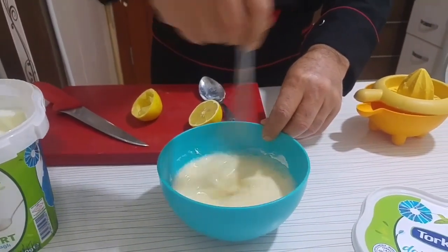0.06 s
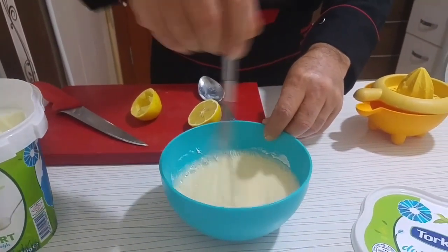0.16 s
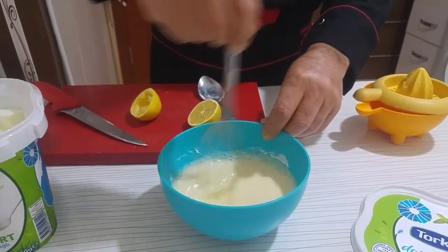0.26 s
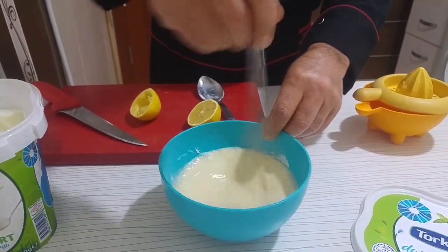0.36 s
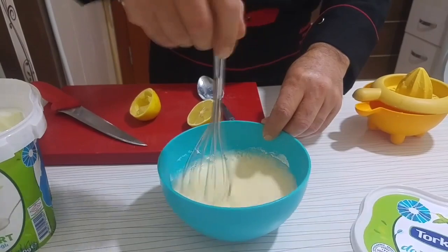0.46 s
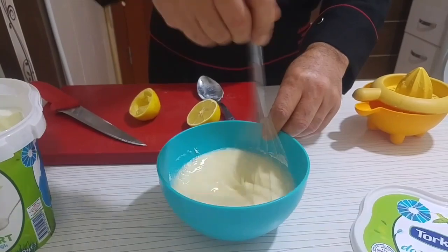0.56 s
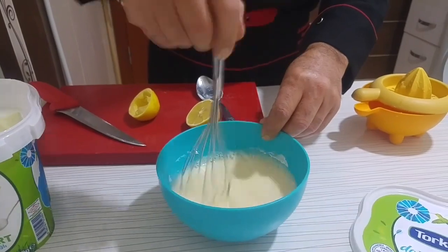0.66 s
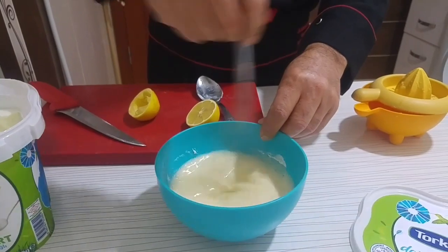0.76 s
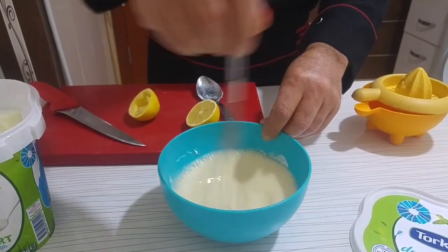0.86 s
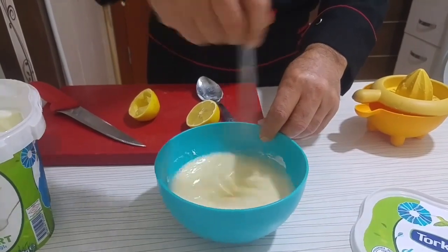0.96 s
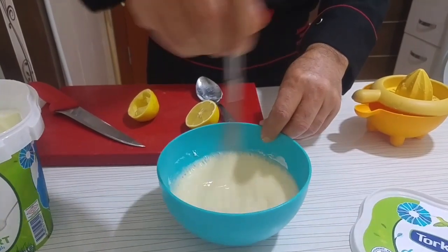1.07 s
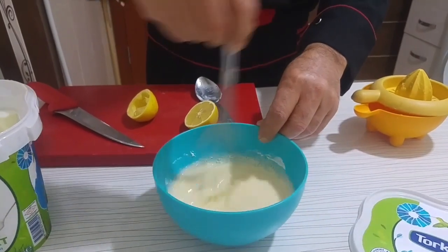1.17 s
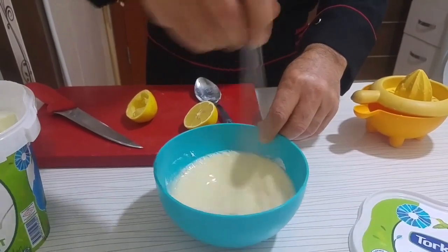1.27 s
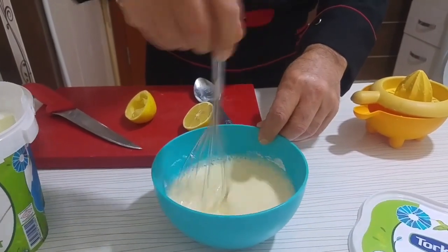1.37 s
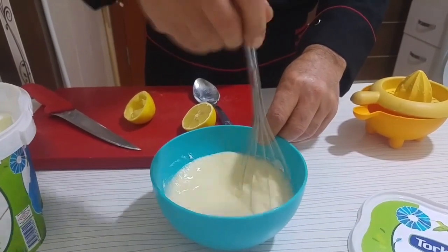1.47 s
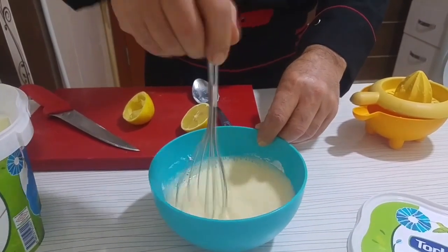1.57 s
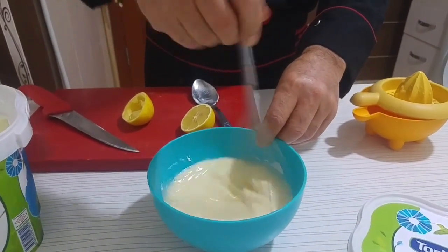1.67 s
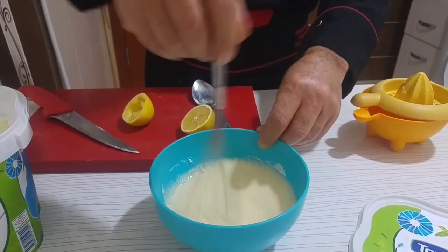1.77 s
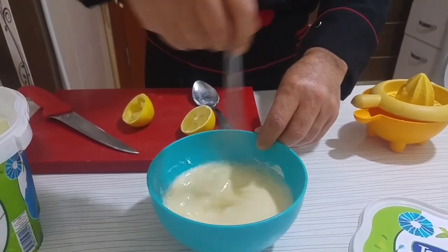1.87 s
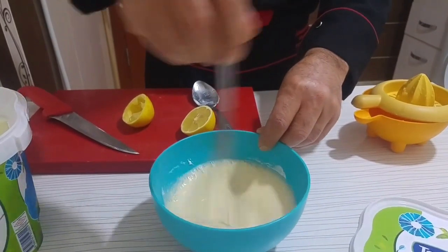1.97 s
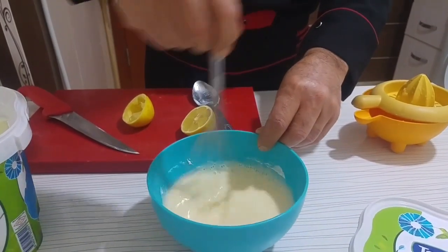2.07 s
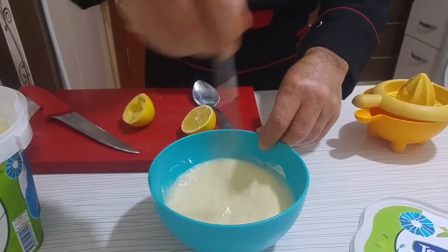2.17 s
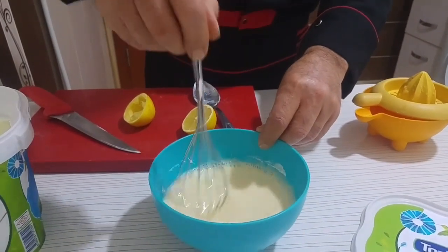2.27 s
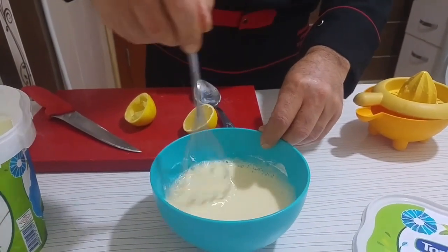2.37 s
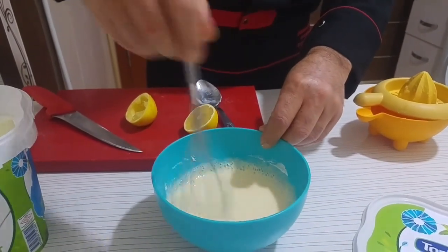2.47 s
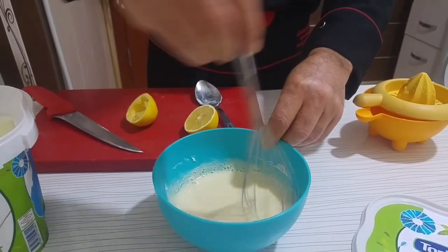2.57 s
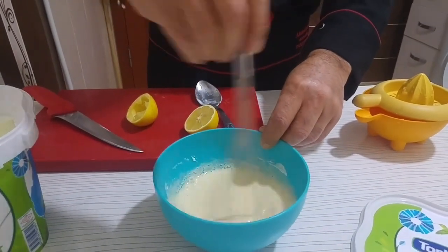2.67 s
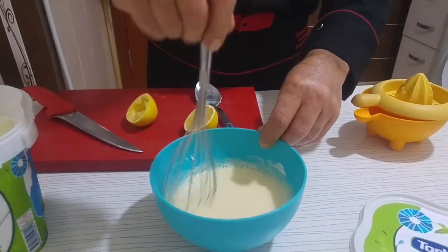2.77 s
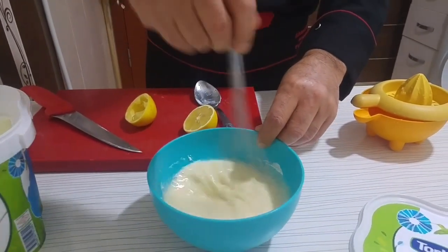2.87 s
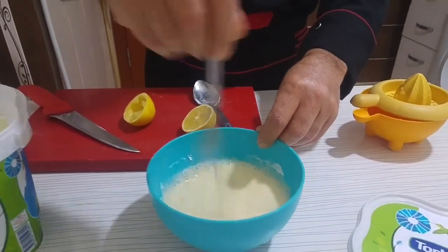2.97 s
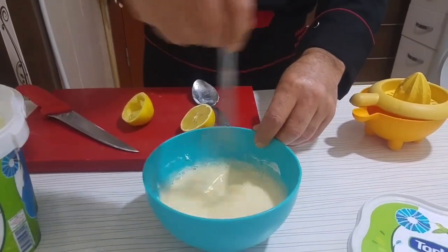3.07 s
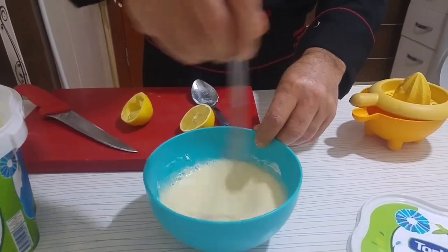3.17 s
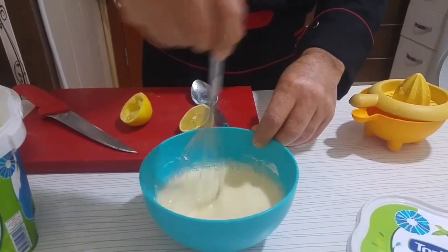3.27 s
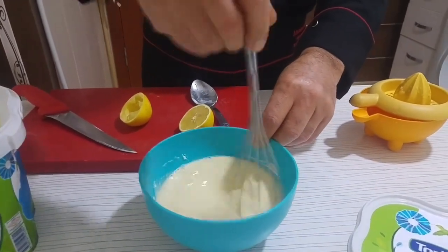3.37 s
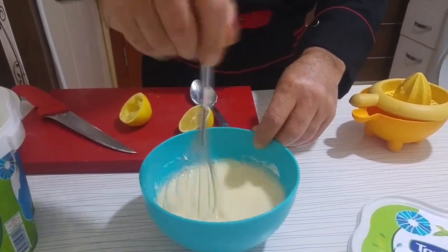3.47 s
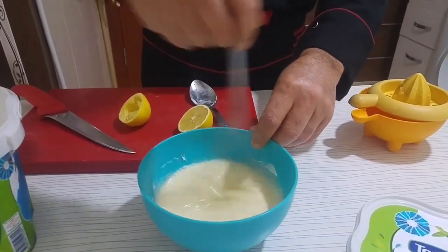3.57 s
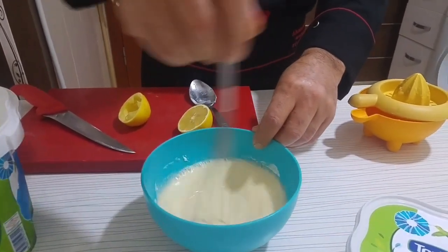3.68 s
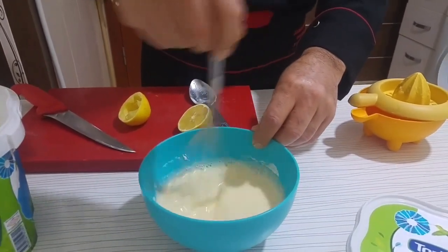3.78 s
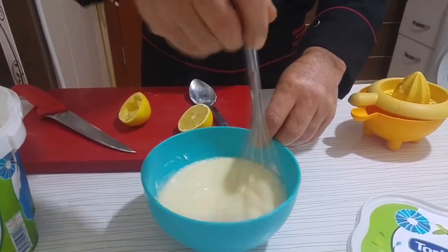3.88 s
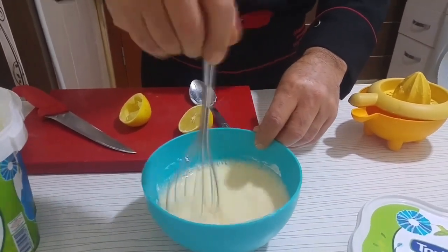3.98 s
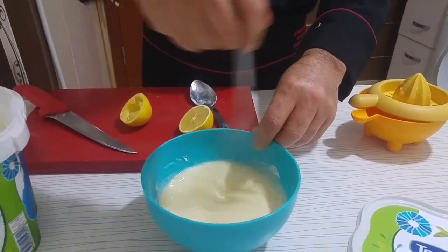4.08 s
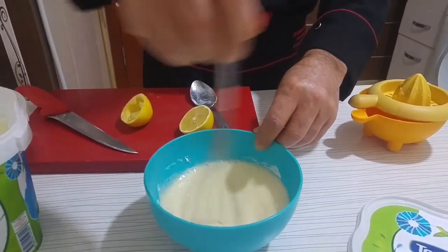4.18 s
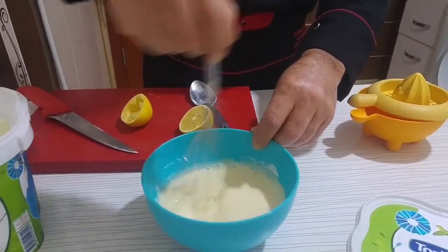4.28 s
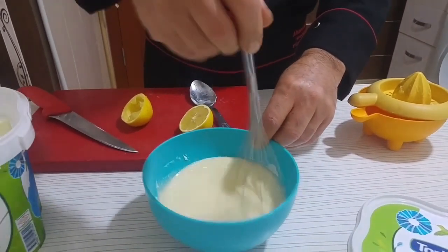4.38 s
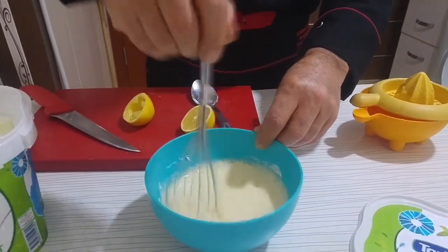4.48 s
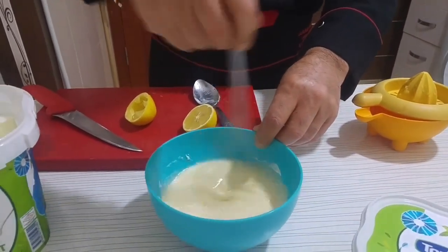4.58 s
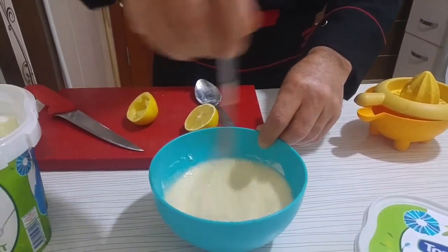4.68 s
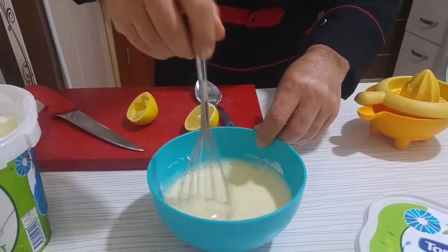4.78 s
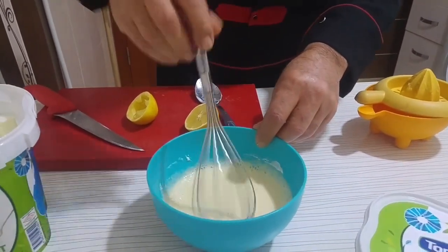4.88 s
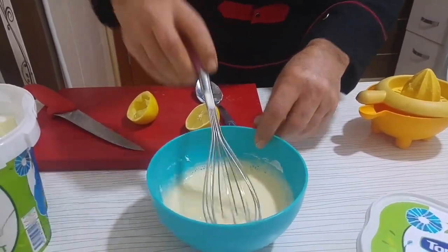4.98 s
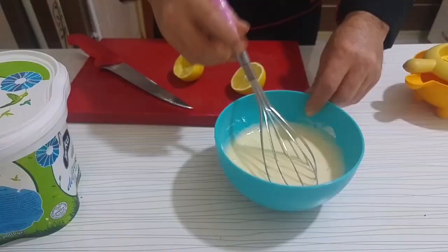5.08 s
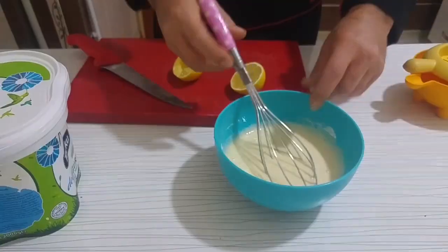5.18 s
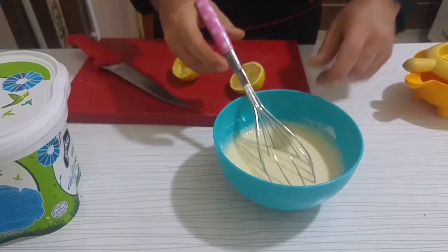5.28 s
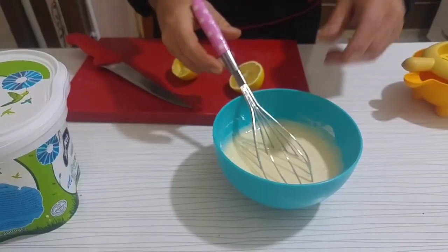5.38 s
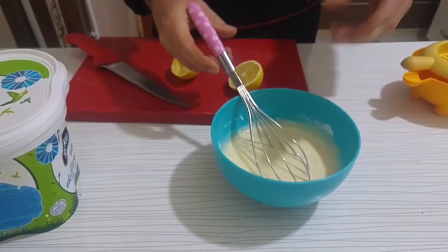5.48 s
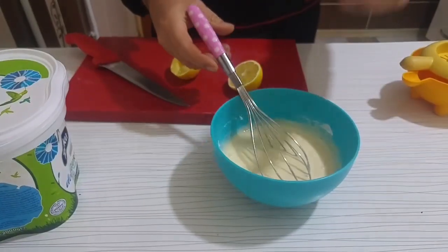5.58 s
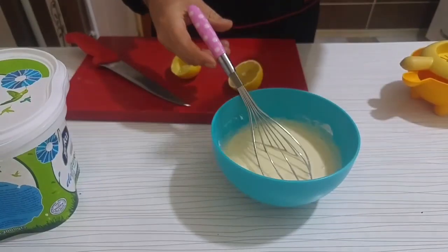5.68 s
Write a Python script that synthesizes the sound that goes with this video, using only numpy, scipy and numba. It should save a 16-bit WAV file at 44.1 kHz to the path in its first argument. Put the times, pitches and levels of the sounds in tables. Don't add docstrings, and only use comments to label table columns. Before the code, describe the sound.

Close stereo pickup in a small kitchen: a wire whisk beats thick batter in a plastic bowl, about four forward strokes a second. Each slap gives a hollow knock and bright wire jangle, answered by lighter return taps and scraping. The bowl rocks with soft table thuds over faint room hum. Near five seconds the whisking stops, the bowl lands with a low bump, and sound cuts off.

```python
import sys
import numpy as np
from scipy import signal
from scipy.fft import rfft, irfft
from scipy.io import wavfile
from numba import njit

SR = 44100
rng = np.random.default_rng(int(sys.argv[2]) if len(sys.argv) > 2 else 0)


def int16_out(signal):
    q = np.round(np.clip(np.atleast_2d(signal).T, -1, 1) * 32767)
    wavfile.write(sys.argv[1], SR, q.astype(np.int16))


def natural_amplitude(level_db):
    exponent = np.asarray(level_db, float) / 20
    return 10 ** exponent


N = 252252

STOP_S = 5.2735
SLAP_MS, FLURRY_MS = 11, 6.5
PORT_LAG_MS, PORT_SPREAD_MS, PORT_LEAN_DB = 0.025, 0.068, -0.04

# (frequency [Hz], width [Hz], level [dB])
WALL_MODES = [(695, 108, -2.5), (1008.5, 61, -2), (1190, 76, -4), (1265, 43, -3.5), (1440, 90, -17),
              (1730, 37, -2.5), (1830, 110, 2.5), (2102, 85, 3.5), (2090, 83, -1), (2200, 39, -9),
              (2648, 90, -6.5)]
# (frequency [Hz], width [Hz], level [dB])
LOOP_MODES = [(2480, 84, -14), (3730, 77, -5.5), (4880, 41, 1), (5200, 52, -5), (6647, 45, -7),
              (8282, 60, -5.5)]


def clacks():
    s, db, hz, bright_db, length_ms, wire_hz = contacts()
    s = s - 0.003
    db, bright_db, length_ms = db[:, None], bright_db[:, None], length_ms[:, None]
    latest = np.maximum(np.searchsorted(s, np.arange(N) / SR) - 1, 0)

    at, size, lag = flurry(s, 1.4 * length_ms, count=28, swell=0.55, uneven_db=3.0)
    body = clicks(at, size * natural_amplitude(db), lag, 3.0)
    wall = ring(body, WALL_MODES)
    spot = band_both(body, hz[latest], 98.0)
    knock = band_both(band_both(body, steady(1450), 850.0), steady(1500), 750.0)
    wire = band_both(clicks(at, size * natural_amplitude(db + bright_db), 3.4 * lag, -1.7), wire_hz[latest], 490.0)
    loops = ring(clicks(at, size * natural_amplitude(db + 0.98 * bright_db), 3.0 * lag, 0), LOOP_MODES)

    at, size, lag = flurry(s, 1.7 * length_ms, count=70, uneven_db=2.0)
    slap = jangle(at, size * natural_amplitude(db + bright_db), lag, t60_s=0.0053, broad=0.33)

    at, size, lag = flurry(s, 7.5 * length_ms, count=190, swell=0.2, uneven_db=2.5)
    light_db = -2 * (length_ms != SLAP_MS)
    skid = jangle(at, size * natural_amplitude(db + bright_db + light_db), lag, t60_s=0.034, broad=0.21)
    struck = natural_amplitude(-11) * wall + natural_amplitude(34.5) * spot + natural_amplitude(17.0) * knock
    wiry = natural_amplitude(35.0) * wire + natural_amplitude(-14) * loops + natural_amplitude(32) * slap + natural_amplitude(26) * skid
    return struck + wiry


# (time [s], peak level [dB], wall pitch [Hz], brightness [dB])
SLAPS = [(0.0939, -16, 1900, -7), (0.163, -10.5, 1370, -6.5), (0.3883, -10, 1330, -7.5),
         (0.6192, -5.5, 2030, -9), (0.857, -8, 1410, -7), (1.0847, -8.5, 1360, -4), (1.305, -10, 1420, -6),
         (1.549, -8, 1476, -4), (1.7737, -10.5, 2100, -8.5), (1.918, 0, 1730, -16),
         (1.9927, -7.5, 1380, -3.5), (2.229, -5, 2090, -7), (2.484, -2, 1736, -12),
         (2.9589, -8.5, 1946, -9), (2.978, -12.5, 1167, -13.5), (3.2009, -2.5, 2090, -8),
         (3.2051, -10, 1305, -3), (3.493, -15, 1250, -5), (3.6752, -10, 1376, -5.5),
         (3.8554, -8, 1780, -14.5), (3.919, -7.5, 1380, -6), (4.1658, -9, 1450, -7), (4.429, -12, 1100, -8),
         (4.4359, -14.5, 1400, -3), (4.671, -11.5, 1470, -1.5), (4.9236, -8.5, 1440, -4.5)]
# (time [s], peak level [dB], wall pitch [Hz], brightness [dB])
SCUFFS = [(0.0794, -15, 1820, -21), (0.5342, -17, 1870, -34), (0.6594, -17.5, 1670, -8.5),
          (0.9906, -16.5, 1950, -22.5), (1.052, -22.5, 1910, -5), (1.2301, -17, 1950, -20),
          (1.28, -22, 1900, -4), (1.5918, -11, 1280, -12), (1.6699, -15.5, 1730, -10),
          (1.694, -12.5, 1730, -14.5), (1.7469, -23.5, 1830, -6.5), (2.1201, -10, 2200, -22),
          (2.37, -12.5, 1730, -16), (2.7236, -23, 1300, -13), (2.7681, -22, 1300, -16),
          (2.7811, -23.5, 1830, -6.5), (2.8626, -22.5, 1180, -20), (2.8918, -20, 2010, -17),
          (3.133, -12.5, 1780, -13.5), (3.352, -19.5, 2020, -22), (3.44, -16.5, 1970, -10),
          (1.4556, -12.5, 1900, -16.5), (4.0072, -19, 1650, -14.5), (4.0711, -15.5, 1990, -23.5),
          (4.2098, -21, 1340, -7), (4.3655, -16, 1730, -13.5), (4.4729, -11, 1980, -14),
          (4.576, -11.5, 1830, -11), (4.838, -12.5, 1730, -12), (5.22, -37.5, 1190, -10.5)]
# (time [s], peak level [dB], brightness [dB])
REBOUNDS = [(0.208, -17, -6.5), (0.4393, -17, -6.5), (0.8984, -14, -8), (1.0124, -15, -11),
            (1.1328, -11, -14), (1.3597, -13, -10), (1.3868, -17.5, -14.5), (1.8237, -12.5, -12.5),
            (2.6086, -15, -31), (2.7053, -26, -14.5), (3.0945, -13, -10), (3.3642, -12.5, -13.5),
            (3.593, -14, -13.5), (3.738, -17.5, -13), (3.976, -11.5, -22), (4.2232, -9, -11),
            (4.7282, -10, -9.5), (4.982, -18, -26.5), (5.262, -33, -9.5)]
# (time [s], peak level [dB], brightness [dB], ring level [dB])
TAPS = [(0.014, -31.5, -25, -24), (0.055, -22.5, -41, -44.5), (0.096, -35, -26, -26),
        (0.2616, -19, -31, -28), (0.4831, -13.5, -22.5, -27), (0.7206, -16.5, -12, -19.5),
        (0.9428, -20, -6, -20), (1.178, -26.5, -28, -25), (1.4117, -15, -9.5, -20),
        (1.6405, -21.5, -13.5, -22), (1.8569, -18.5, -21.5, -17.5), (2.0926, -22.5, -21, -16.5),
        (2.159, -28, -19.5, -21.5), (2.321, -27.5, -20.5, -24.5), (3.027, -33.5, -17.5, -38),
        (3.5182, -17, -15.5, -19), (3.7718, -11.5, -14.5, -15.5), (4.0397, -17, -18.5, -29),
        (4.2822, -15.5, -22.5, -27), (4.322, -21, -17, -39), (4.5352, -10.5, -16.5, -21.5),
        (4.8008, -18.5, -25.5, -17), (5.019, -20, -27, -19.5)]


def contacts():
    rebound_hz, tap_hz = 967, 1450
    rows = SLAPS + SCUFFS
    rows = rows + [(s, db, rebound_hz, bright) for s, db, bright in REBOUNDS]
    rows = rows + [(s, db, tap_hz, bright) for s, db, bright, _ in TAPS]
    s, db, hz, bright_db = np.transpose(sorted(rows))
    octaves = 0.16 * np.maximum(db + bright_db + 29.5, 0) + 0.2 * rng.standard_normal(len(s))
    wire_hz = np.clip(3300 * 2 ** octaves, 2600, 6500)
    length_ms = np.where(np.isin(s, np.transpose(SLAPS)[0]), SLAP_MS, FLURRY_MS)
    return s, db, hz, bright_db, length_ms, wire_hz


# (frequency [Hz], density level [dB per Hz])
CRACK = [(1350, -63.5), (2300, 1), (3070, -2), (3920, -0.5), (4260, -1), (5020, -0.5), (7140, -6),
         (7750, -11), (8490, -7.5), (9840, -10.5), (13800, -11), (15300, -22), (16400, -53)]


def jangle(at, size, lag, t60_s, broad):
    t = np.arange(SR // 20) / SR
    loop, out = rng.integers(0, 6, at.shape), 0
    for k in range(6):
        shared, own = rng.standard_normal(len(t)), rng.standard_normal((2, len(t)))
        tail = level((shared + 1.2 * own) * natural_amplitude(-60 * t / t60_s), -33)
        edges_hz = 2200 * 1.4 ** np.array([k, k + 1])
        band = signal.butter(2, edges_hz, "band", fs=SR, output="sos")
        tail = broad * tail + (1 - broad) * np.sqrt(6) * signal.sosfilt(band, tail)
        ticks = clicks(at, size * (loop == k), lag, 0)
        out = out + signal.oaconvolve(ticks, tail, axes=1)[:, :N]
    return colour(out, CRACK) * natural_amplitude([[-0.5], [0.5]])


# (time [s], level [dB])
EFFORT = [(0, 1.5), (0.15, -3), (0.7, 0), (1.2, 0), (2.1, 2.5), (2.4, -3.5), (2.54, -24), (2.69, -14),
          (2.92, -1.5), (3.14, -7.5), (3.57, 1), (4.12, 1), (4.5, 3), (4.92, 0.5), (5.02, -15), (5.14, -39),
          (5.24, -80)]


def drag():
    slaps, taps, rocks = np.transpose(SLAPS), np.transpose(TAPS), np.transpose(ROCKS)
    press = natural_amplitude(np.interp(np.arange(N) / SR, *np.transpose(EFFORT)))
    leaving = after(N / SR - slaps[0], 0 * slaps[0], fade_s=0.044)[::-1]
    lift = natural_amplitude(-4 * np.minimum(leaving, 1))

    at = np.sort(rng.random(8000)) * STOP_S
    sign = np.sign(rng.standard_normal(len(at)))
    grip = np.minimum(rng.exponential(size=len(at)), 4)
    lag = PORT_LAG_MS + PORT_SPREAD_MS * rng.standard_normal(len(at))
    pair = 2 * rng.integers(0, 10, len(at))
    modes = WALL_MODES + WHISK_MODES + LOOP_MODES
    wall = 0
    for k in range(0, 20, 2):
        wall = wall + ring(clicks(at, sign * natural_amplitude(7.3 * grip) * (pair == k), lag, 1.5), modes[k:k + 2])
    wires = jangle(at, sign * natural_amplitude(2.3 * grip), lag, t60_s=0.078, broad=0.13)
    table = ring(clicks(at, sign, lag, 0), TABLE_LOW + TABLE_HIGH)

    skid = after(taps[0], taps[3] - 14, fade_s=0.04)
    chatter = after(rocks[0], rocks[1] - 15.5, fade_s=0.12)
    scrape = level(wall, -2.5) * lift * (press * natural_amplitude(-36) + skid)
    rustle = level(wires, -4.0) * lift * press * natural_amplitude(-32)
    shake = level(table, -2.0) * (press * natural_amplitude(-43) + chatter)
    return scrape + rustle + shake


# (time [s], peak level [dB], upper modes [dB])
ROCKS = [(0.034, -25, -27), (0.241, -27.5, -12), (0.479, -27, -7.5), (0.717, -23.5, 0), (0.896, -28, -9),
         (1.172, -19, -12.5), (1.406, -23.5, -4), (1.586, -22, -11.5), (1.693, -36, -19), (1.869, -22, -12),
         (1.944, -25.5, -9), (2.091, -13.5, -7.5), (2.234, -21, -15), (2.317, -14, -9), (2.872, -33, -8),
         (3.027, -16, -6.5), (3.205, -18.5, -11.5), (3.364, -36.5, -38), (3.499, -24.5, -24),
         (3.622, -38.5, -9), (3.777, -21, -28.5), (4.035, -17, -4.5), (4.222, -19, -10.5),
         (4.473, -27.5, -1.5), (4.535, -15, -10), (4.735, -28.5, -0.5), (4.776, -15.5, -9),
         (5.056, -27, -7.5)]
# (time [s], peak level [dB], upper modes [dB])
SETTLE = [
    (5.219, -38, -13),
    (5.264, -13.5, -17.5),
]
# (frequency [Hz], width [Hz], level [dB])
TABLE_LOW = [(62.2, 40, -20), (135.7, 5.9, -3.5), (163.9, 5.2, -7.5)]
TABLE_HIGH = [(206.7, 8.9, -4.5), (255, 4.5, -11), (294.5, 12.8, -2), (392.3, 66, 1.5), (636, 80, 3)]


def thuds():
    pushes = [(s, db - 23, -7) for s, db, _, _ in SLAPS]
    s, db, upper_db = np.transpose(ROCKS + SETTLE + pushes)
    at, size, lag = flurry(s, 7, count=3)
    size = size * [0, 0.6, 0.5] + [1, 0, 0]
    low = ring(clicks(at, size * natural_amplitude(db)[:, None], lag, 0), TABLE_LOW)
    high = ring(clicks(at, size * natural_amplitude(db + upper_db)[:, None], lag, -1.9), TABLE_HIGH)
    soft = signal.butter(2, 1100, fs=SR, output="sos")
    return signal.sosfilt(soft, natural_amplitude(-7.5) * low + natural_amplitude(-1) * high)


# (frequency [Hz], width [Hz], level [dB])
WHISK_MODES = [(869, 13, 1.5), (806, 14, -35.5), (1440, 96, 0)]


def whisk():
    rings = [(s, ring_db) for s, _, _, ring_db in TAPS]
    rings = rings + [(s, db - 27.5) for s, db, _ in REBOUNDS]
    s, db = np.transpose(rings)
    return natural_amplitude(-1.0) * ring(clicks(s + 0.003, natural_amplitude(db), PORT_LAG_MS, 1.3), WHISK_MODES)


def echo(near):
    t60_s, damp = 0.3, 0.3
    lags = rng.integers(300, 1800, 8)
    high = signal.butter(2, 300, "high", fs=SR, output="sos")
    treble = signal.sosfilt(high, near.mean(axis=0))
    return natural_amplitude(-10.5) * walls(treble, lags, natural_amplitude(-60 * lags / SR / t60_s), damp)


@njit
def walls(x, lags, gain, damp):
    line, soft, out = np.zeros((8, 4096)), np.zeros(8), np.zeros((2, len(x)))
    for i in range(len(x)):
        total = 0.
        for k in range(8):
            soft[k] += (1 - damp) * (gain[k] * line[k, (i - lags[k]) & 4095] - soft[k])
            total += soft[k]
            out[k % 2, i] += soft[k]
        for k in range(8):
            line[k, i & 4095] = x[i] + soft[k] - total / 4
    return out


# (frequency [Hz], density level [dB per Hz])
ROOM_TONE = [(22, -30.5), (40, -7.5), (65, -9), (110, -17), (300, -8), (520, -22.5), (900, -1),
             (1500, -15.5), (2600, -29), (4400, -17.5), (5200, -20), (5900, -28), (6800, -27.5),
             (15500, -39)]
# (frequency [Hz], width [Hz], level [dB])
WHISTLES = [(5200, 50, -56.5), (6750, 60, -61)]


def kitchen():
    mid, side = colour(rng.standard_normal((2, N)), ROOM_TONE)
    side = signal.sosfilt(signal.butter(1, 400, "high", fs=SR, output="sos"), side)
    out = level(np.array([mid + side, mid - side]), -41.5)
    for hz, width, db in WHISTLES:
        out = out + level(band_both(rng.standard_normal((2, N)), steady(hz), 1. * width), db)
    return out


def flurry(s, length_ms, count, swell=0., uneven_db=0.):
    u, g = rng.random((len(s), 2 * count)), rng.standard_normal((len(s), 2 * count))
    order = np.arange(count)
    wait = -np.log(1 - 0.9 * (order + u[:, :count] * (order > 0)) / count)
    size_db = -uneven_db * np.log(1 - 0.98 * u[:, count:]) - 1.5 * wait ** 2
    size = np.sign(g[:, :count]) * natural_amplitude(size_db) * (1 - swell * np.exp(-wait / 0.11))
    size = size / np.sqrt(np.sum(size ** 2, axis=1, keepdims=True))
    lag_ms = PORT_LAG_MS + PORT_SPREAD_MS * g[:, count:]
    return s[:, None] + wait * length_ms / 1000, size, lag_ms


def clicks(s, size, lag_ms, pan_db):
    out = np.zeros((2, N + 1))
    for c, sign in enumerate((1, -1)):
        at = np.clip((s - sign * lag_ms / 2000) * SR, 0, N - 1).ravel()
        height = (size * natural_amplitude(sign * pan_db / 2)).ravel()
        np.add.at(out[c], at.astype(int), height * (1 - at % 1))
        np.add.at(out[c], at.astype(int) + 1, height * (at % 1))
    return out[:, :N]


def after(s, db, fade_s):
    return signal.lfilter([1], [1, -np.exp(-1 / (fade_s * SR))], clicks(s, natural_amplitude(db), 0, 0)[0])


def ring(x, modes):
    out = np.zeros((2, N))
    for k, (hz, width, db) in enumerate(modes):
        for c in range(2):
            gain = (-1) ** k * natural_amplitude(db + (-1) ** (k + c) * PORT_LEAN_DB)
            out[c] += gain * SR / (2 * np.pi * width) * svf(x[c], steady(hz), 1. * width)
    return out


def steady(hz):
    return np.full(N, 1. * hz)


def band_both(x, hz, width):
    return np.array([svf(port, hz, width) for port in x])


@njit
def svf(x, hz, width):
    y, b, l, g, k = np.empty(len(x)), 0., 0., 0., 0.
    for i in range(len(x)):
        if i == 0 or hz[i] != hz[i - 1]:
            g, k = np.tan(np.pi * hz[i] / SR), width / hz[i]
        v = (b + g * (x[i] + 1e-18 - l)) / (1 + g * (g + k))
        b, l, y[i] = 2 * v - b, l + 2 * g * v, k * v
    return y


def colour(x, points):
    hz, db = np.transpose(points)
    grid_hz = np.arange(1025) * SR / 2048
    shape_db = np.interp(np.log(grid_hz + 1), np.log(hz), db)
    cep = irfft(shape_db * np.log(10) / 20)
    cep[1:1024], cep[1025:] = 2 * cep[1:1024], 0
    return signal.fftconvolve(x, irfft(np.exp(rfft(cep)))[None])[:, :N]


def level(x, db):
    return x * natural_amplitude(db) / np.sqrt(np.mean(x ** 2))


def scene():
    near = clacks() + drag() + thuds() + whisk()
    return near + echo(near) + kitchen()


def top_cut(x):
    return signal.sosfilt(signal.butter(12, 16520, fs=SR, output="sos"), x)


def record(dry):
    dip = dry - 0.72 * svf(dry.mean(axis=0), steady(520), 150.0)
    band = signal.butter(3, [8000, 14800], "band", fs=SR, output="sos")
    hiss = level(signal.sosfilt(band, rng.standard_normal((2, N))), -59.5)
    gate = np.clip((STOP_S - np.arange(N) / SR) / 0.004, 0, 1)
    return top_cut((dip + hiss) * gate)


dry = scene()
out = record(dry)
int16_out(out)
```